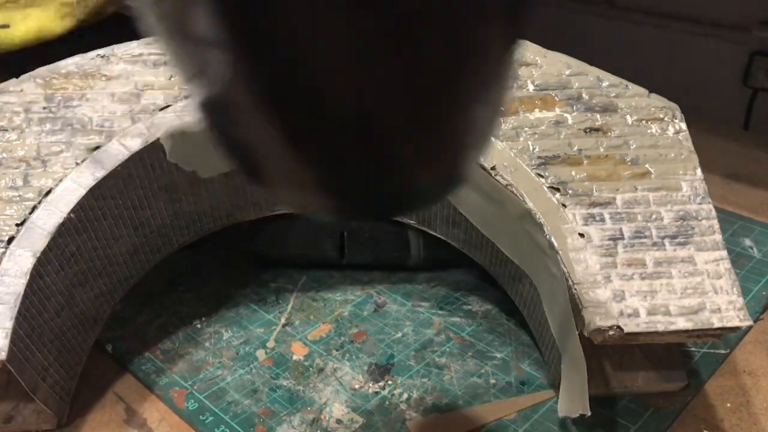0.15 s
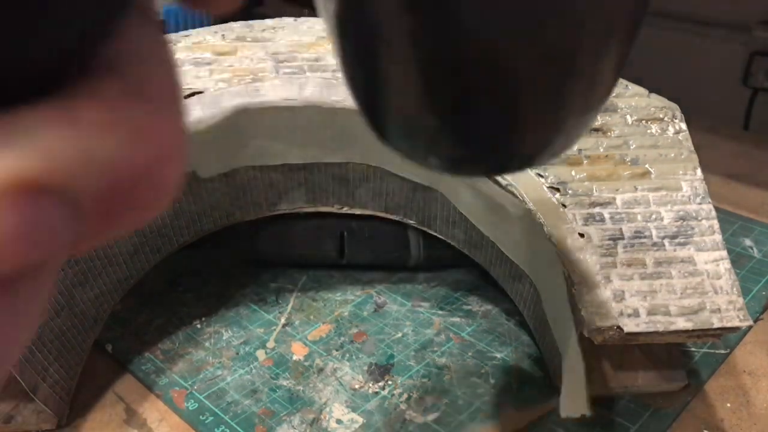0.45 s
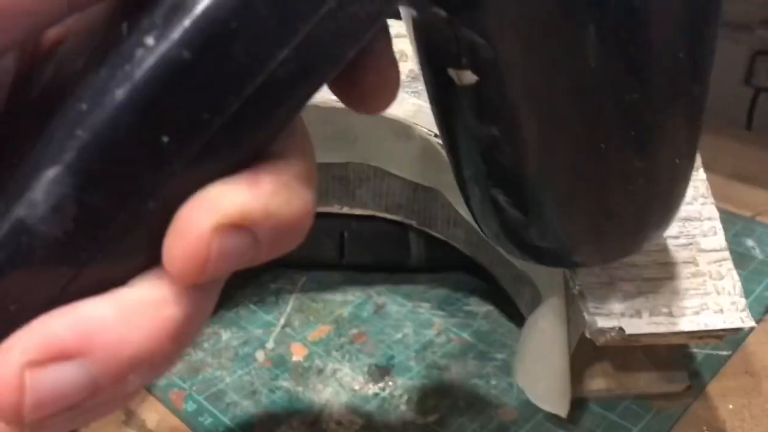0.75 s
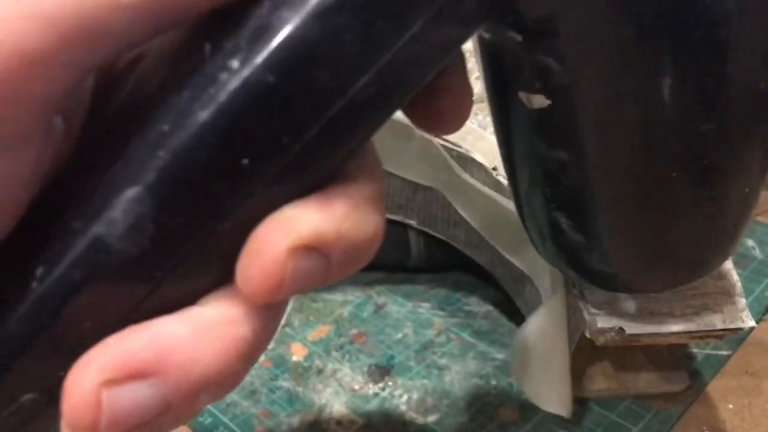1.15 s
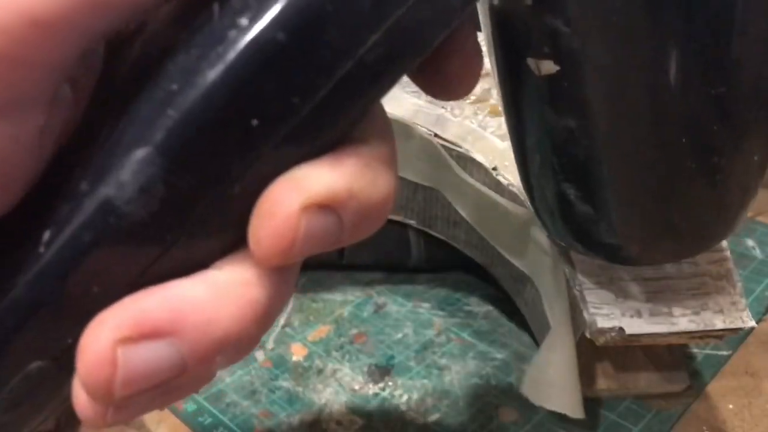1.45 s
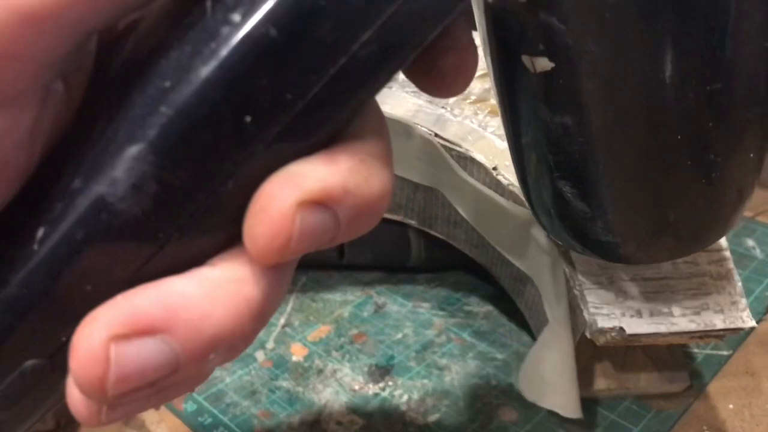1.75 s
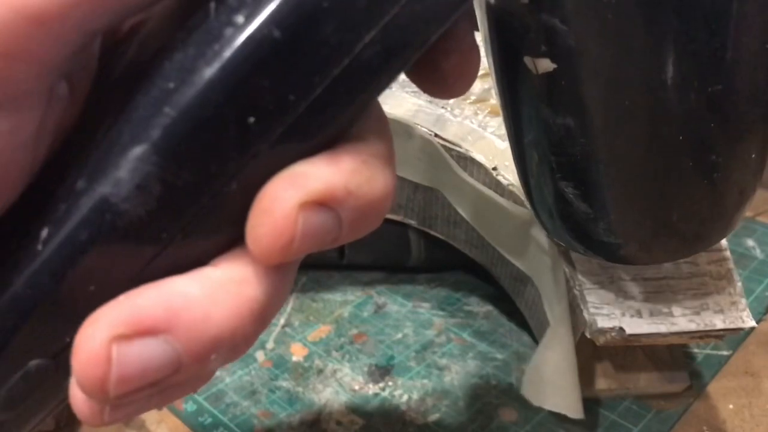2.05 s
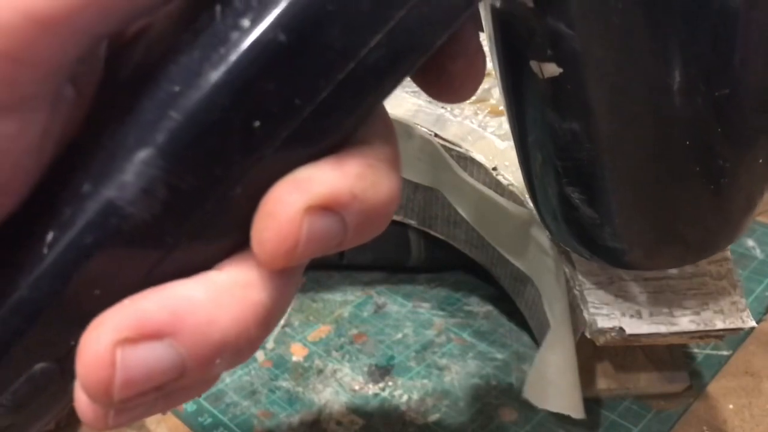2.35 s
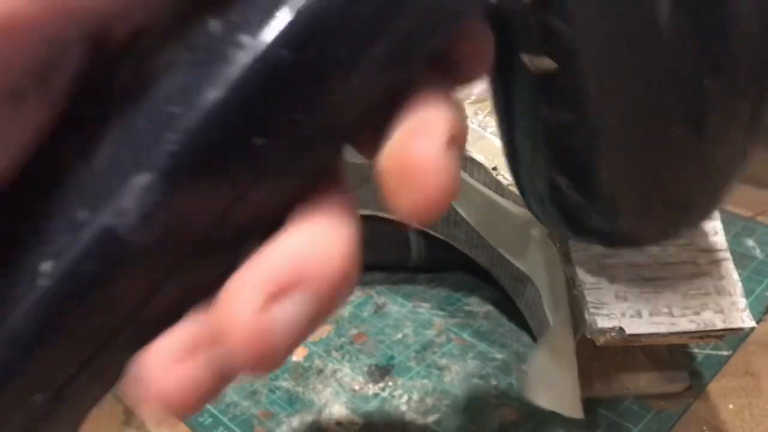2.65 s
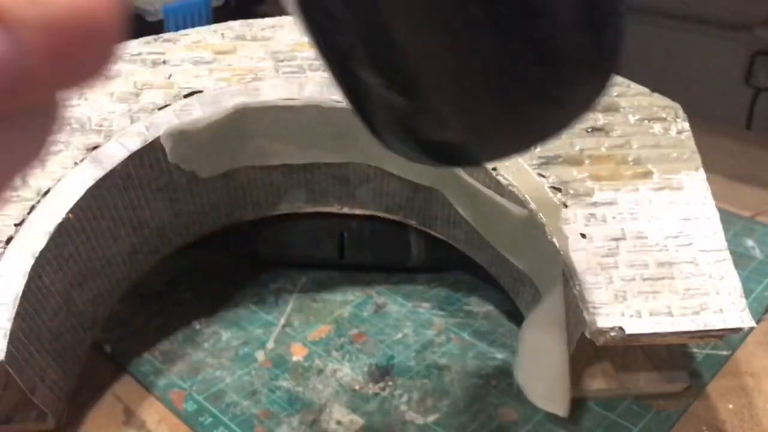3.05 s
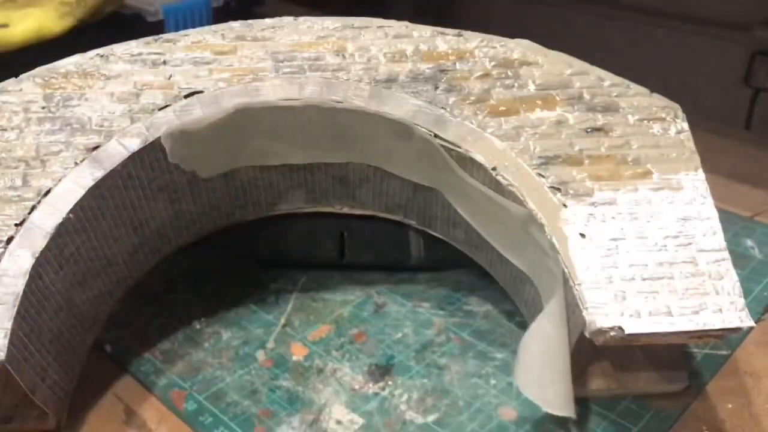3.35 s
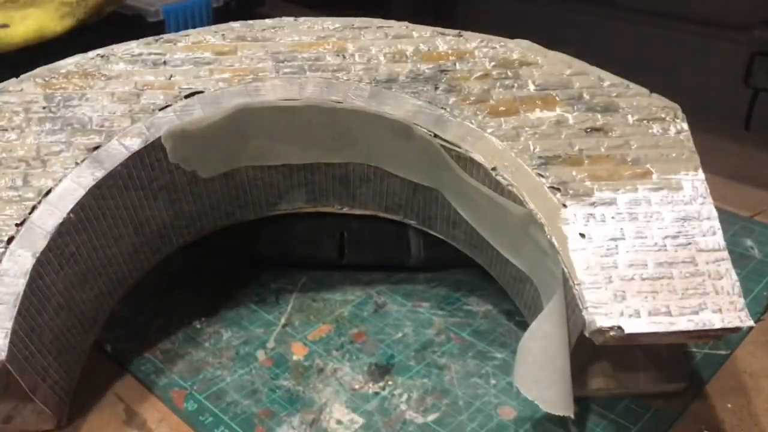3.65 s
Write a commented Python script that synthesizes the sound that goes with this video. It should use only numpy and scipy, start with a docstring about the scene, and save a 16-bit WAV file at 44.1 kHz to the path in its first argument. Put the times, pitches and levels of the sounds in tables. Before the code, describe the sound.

A hair dryer snaps on close by at about 0.1 seconds, rattling briefly as its fan spins up. From 0.5 seconds it runs with a steady rush of air and a thin whine. Soft, low puffs brush the microphone near the start and around 3 seconds. The switch clicks twice just before 3 seconds, and the whine falls and fades by about 3.5, leaving a faint room hum.

```python
"""A handheld hairdryer, close up, over a work table in a quiet room. The switch snaps on, the motor brushes
tick and a five-bladed fan spins up: a thin whine over a rush of air that rings in the barrel. The air stream
brushes the microphone in soft, low puffs. The switch clicks back through two positions and the fan coasts down,
leaving a faint low hum."""
import sys
import numpy as np
from scipy import signal
from scipy.fft import rfft, irfft
from scipy.io import wavfile

SR = 44100
rng = np.random.default_rng(int(sys.argv[2]) if len(sys.argv) > 2 else 0)


def int16_out(signal):
    """Quantize to a 16-bit WAV file."""
    q = np.round(np.clip(np.atleast_2d(signal).T, -1, 1) * 32767)
    wavfile.write(sys.argv[1], SR, q.astype(np.int16))


N = 167580
T = np.arange(N) / SR
ON_S, OFF_S = .168, 2.931  # motor power

# Room noise spectrum: freq_hz, relative_db
FLOOR_SPECTRUM = [(25, -7), (50, 0), (100, -6), (200, -13), (400, -16), (900, -22.5), (3000, -28.5),
                  (8000, -35.5), (15500, -37.5)]
# Hum tones: pitch_hz, level_db
HUM_TONES = [(62, -61.5), (74, -64.5), (146, -63.5)]
# Hum envelope: time_s, gain_db
HUM_ENVELOPE = [(.1, -12), (3.4, -2)]
# Switch snaps: start_s, ring_db, tick_db, tick_centre_hz
CLICKS = [(.1246, -26, -41, 6500), (.1262, -35, -29, 9500), (2.9448, -27, -29, 9000),
          (2.9850, -23, -19, 4200), (2.9876, -28, -31, 3000)]
# Plastic handle modes: pitch_hz, level_db, t60_s
HANDLE_MODES = [(1000, -24, .04), (1830, 0, .024), (2060, -6, .016), (2450, -10, .014), (3400, -15, .008),
                (4400, -17, .007), (5600, -19, .008)]
# Turbulence spectrum: freq_hz, relative_db
RUSH_SPECTRUM = [(30, -45), (60, -21), (140, -10.5), (400, -8), (900, -7), (1250, 1), (1800, -11.5),
                 (2800, -18.5), (5000, -29), (7500, -33.5), (10300, -39.5), (15500, -50.5)]
# Barrel and nozzle peaks and notches: centre_hz, half_width_hz, gain_db
BARREL_RESONANCES = [(206, 112, 6), (583, 26, 5.5), (724, 95, 5.5), (913, 33, -3.5), (976, 8, 0),
                     (1046.6, 93.4, 11.5), (2268, 203, 7), (3394, 385, 6), (4370, 340, 4.5),
                     (5720, 370, 6.5), (6460, 290, 6), (8570, 220, 4.5), (9321, 257, 5), (10350, 457, -4),
                     (11400, 410, 3)]
# Rush growth with fan speed: freq_hz, exponent
RUSH_EXPONENTS = [(100, 1.5), (300, 1.24), (700, 2.94), (1000, 2.45), (3000, 3.74), (8000, 5.1)]
# Rush envelope as the dryer is moved about: time_s, gain_db
RUSH_ENVELOPE = [(.15, 23), (.185, 16.5), (.215, 3), (.26, 1), (.33, 1), (.45, -2), (.7, 0.2), (1.1, 1),
                 (2.5, 0.5), (2.83, 1), (3.0, 0.5), (3.18, 0.5), (3.28, -3), (3.33, -7), (3.42, -15)]
# Rush treble shelf: time_s, gain_db
TREBLE_ENVELOPE = [(.3, 6.5), (.45, 5), (.6, 1), (1.3, -0.5), (2.4, 0), (2.85, -2), (3.1, 1.5)]
# Rush upper-mid band: time_s, gain_db
MID_ENVELOPE = [(.3, 2), (.6, 3), (.8, -1), (2.55, -.5), (2.75, 2), (3.05, 2), (3.15, -2.5)]
# Depth of the brief dip in the rush: freq_hz, gain_db
DIP_DEPTH = [(150, -13), (1000, -25), (5000, -28)]
# Shaft running speed: time_s, rate_hz
RUN_SPEED = [(.6, 194.3), (.75, 194.5), (.9, 193.7), (1.25, 194.2), (1.5, 194.0), (1.75, 193.5),
             (2.0, 194.6), (2.3, 194.5), (2.55, 193.6), (2.9, 193.9)]
# Whine partials, shaft orders and multiples of 5 from blade passing: shaft_multiple
WHINE_ORDERS = [1, 3, 5, 8, 10, 15, 25, 35]
# Whine partial levels, in the same order: level_db
WHINE_LEVELS_DB = [-43, -54.5, -32, -50, -46.5, -50, -59, -74.5]
# Blade tone envelope: time_s, gain_db
BLADE_ENVELOPE = [(.24, -1), (.33, -.5), (.44, -.5), (.53, 3.5), (.62, 6.5), (.7, -.5), (1, .5), (2.4, .5),
                  (2.85, .5), (2.97, 2.5), (3.03, -1), (3.09, -9)]
# Brush ticks: start_s, level_db
RATTLES = [(.172, -50), (.181, -44), (.192, -42), (.219, -48), (.278, -40), (.291, -39)]
# Brush tick spectrum: freq_hz, relative_db
RATTLE_SPECTRUM = [(300, -15), (1200, -1), (1900, 1.5), (2800, -13), (3800, -4), (7500, -39), (9500, -17),
                   (14000, -39)]
# Air puffs: centre_s, half_length_s, level_db
PUFFS = [(0.334, .12, -47.5), (.56, 0.15, -44.5), (2.96, 0.13, -45)]
# Puff spectrum: freq_hz, relative_db
PUFF_SPECTRUM = [(25, -26), (60, 4.5), (120, 9), (250, -17.5), (1000, -43)]


def amp(db):
    """Decibels to gain."""
    return 10 ** (np.asarray(db) / 20)


def unit_rms(x):
    """Scales to rms 1."""
    return x / np.sqrt(np.mean(x ** 2) + 1e-20)


def at_time(points, t=T):
    """Interpolates a time curve."""
    return np.interp(t, *np.transpose(points))


def at_freq(points, hz):
    """Interpolates on a log-frequency axis."""
    knots_hz, values = np.transpose(points)
    return np.interp(np.log(hz + 1), np.log(knots_hz + 1), values)


def noise(spectrum, peaks=(), size=N):
    """Shaped noise with Gaussian peaks, rms 1."""
    hz = np.fft.rfftfreq(size, 1 / SR)
    peaks_db = sum(db * np.exp(-((hz - centre_hz) / width_hz) ** 2) for centre_hz, width_hz, db in peaks)
    gain = amp(at_freq(spectrum, hz) + peaks_db)
    return unit_rms(irfft(rfft(rng.standard_normal(size)) * gain, size))


def wander(rate_hz):
    """Random drift up to rate_hz, rms 1."""
    hz = np.fft.rfftfreq(N, 1 / SR)
    return unit_rms(irfft(rfft(rng.standard_normal(N)) / (1 + (hz / rate_hz) ** 4), N))


def add(mix, start_s, sound):
    """Mixes a sound in at start_s."""
    part = mix[round(start_s * SR):][:len(sound)]
    part += sound[:len(part)]


def background():
    """Faint room noise and a wavering low hum."""
    hum = np.zeros(N)
    for hz, db in HUM_TONES:
        hum += amp(db + 2 * wander(rate_hz=8)) * np.sin(2 * np.pi * (hz * T + rng.random()))
    return amp(-64) * noise(FLOOR_SPECTRUM) + np.sqrt(2) * hum * amp(at_time(HUM_ENVELOPE))


def switch():
    """Each snap: a sharp contact tick and a short ring of the handle."""
    ring_rise_s, tick_decay_s = .00027, .0008
    out, t = np.zeros(N), T[:SR // 10]
    ring = sum(amp(db - 60 * t / t60_s) * np.sin(2 * np.pi * hz * t) for hz, db, t60_s in HANDLE_MODES)
    ring *= np.minimum(t / ring_rise_s, 1)
    for start_s, ring_db, tick_db, hz in CLICKS:
        tick = noise([(hz / 4, -18), (hz, 0), (hz * 2, -18), (hz * 4, -36)], size=len(t))
        add(out, start_s, amp(ring_db) * ring + amp(tick_db) * tick * np.exp(-t / tick_decay_s))
    return out


def room(x):
    """Adds the short, dull tail of a small room."""
    wet_db, t60_s, predelay_s = -21, .16, .004
    t = T[:SR // 2]
    tail = noise([(1500, 1.5), (10000, -23)], size=len(t)) * amp(-60 * t / t60_s) * (t > predelay_s)
    return x + amp(wet_db) * signal.fftconvolve(x, tail / np.linalg.norm(tail))[:N]


def fan_speed(t):
    """Exponential spin-up and coast-down, as a share of running speed."""
    spin_up_s, coast_s = .096, .31
    rise = 1 - np.exp(-np.maximum(t - ON_S, 0) / spin_up_s)
    return rise * np.exp(-np.maximum(t - OFF_S, 0) / coast_s)


def dip(t, centre_s=.657, half_width_s=.011):
    """Shape of a brief level dip in rush and whine, 0 to 1."""
    return np.exp(-abs((t - centre_s) / half_width_s) ** 1.32)


def rush():
    """Turbulent air through fixed barrel resonances; swells and brightens with fan speed."""
    treble_hz, mid_hz, mid_width_hz, gust_db = 2476, 2120, 350, .71
    hz, t, bands = signal.stft(noise(RUSH_SPECTRUM, BARREL_RESONANCES), SR, nperseg=256, noverlap=192)
    hz = hz[:, None]
    click_s = CLICKS[0][0]
    min_flow = .1 * np.clip((t - click_s) / (ON_S - click_s), 0, 1) * (t < OFF_S)
    flow = np.maximum(fan_speed(t), min_flow)
    gain_db = at_freq(RUSH_EXPONENTS, hz) * 20 * np.log10(flow + 1e-4) + at_time(RUSH_ENVELOPE, t)
    gain_db += at_time(TREBLE_ENVELOPE, t) * hz ** 2 / (hz ** 2 + treble_hz ** 2)
    gain_db += at_time(MID_ENVELOPE, t) * np.exp(-((hz - mid_hz) / mid_width_hz) ** 2)
    gain_db += at_freq(DIP_DEPTH, hz) * dip(t)
    air = signal.istft(bands * amp(gain_db), SR, nperseg=256, noverlap=192)[1][:N]
    return air * amp(-26 + gust_db * wander(rate_hz=14))


def whine():
    """Shaft and blade tones track the fan and flutter in the airflow; overtones need full speed."""
    blades, wobble_share, flutter_db, dip_db = 5, .0014, 1.3, -23.5
    speed = fan_speed(T)
    shaft_hz = speed * at_time(RUN_SPEED) * (1 + wobble_share * wander(rate_hz=30))
    turns = np.cumsum(shaft_hz) / SR
    tones = np.zeros(N)
    for order, db in zip(WHINE_ORDERS, WHINE_LEVELS_DB):
        growth = speed ** (2.6 + max(order - blades, 0))
        level_db = db + flutter_db * wander(rate_hz=25) + (order == blades) * at_time(BLADE_ENVELOPE)
        tones += growth * amp(level_db) * np.sin(2 * np.pi * (order * turns + rng.random()))
    return np.sqrt(2) * tones * amp(dip_db * dip(T))


def rattle():
    """The motor brushes tick on the commutator during spin-up, heard through the handle."""
    rise_s, decay_s = .0015, .006
    out, t = np.zeros(N), T[:SR // 20]
    envelope = np.minimum(t / rise_s, 1) * np.exp(-t / decay_s)
    for start_s, db in RATTLES:
        add(out, start_s, amp(db) * noise(RATTLE_SPECTRUM, size=len(t)) * envelope)
    return out


def puffs():
    """Low buffeting as the air stream brushes the microphone."""
    envelope = sum(amp(db) * np.exp(-((T - centre_s) / half_s) ** 2) for centre_s, half_s, db in PUFFS)
    return noise(PUFF_SPECTRUM) * envelope


def scene():
    """Dryer and background, mono; room tail on switch and rattle only."""
    return (rush() + whine() + puffs() + room(switch() + rattle()) + background())[None]


def record(dry, cutoff_hz=15800):
    """Low-pass band limit."""
    lowpass = signal.firwin(511, cutoff_hz, window=("kaiser", 9), fs=SR)
    return signal.oaconvolve(dry, lowpass[None], "same")


dry = scene()
out = record(dry)
int16_out(out)
```